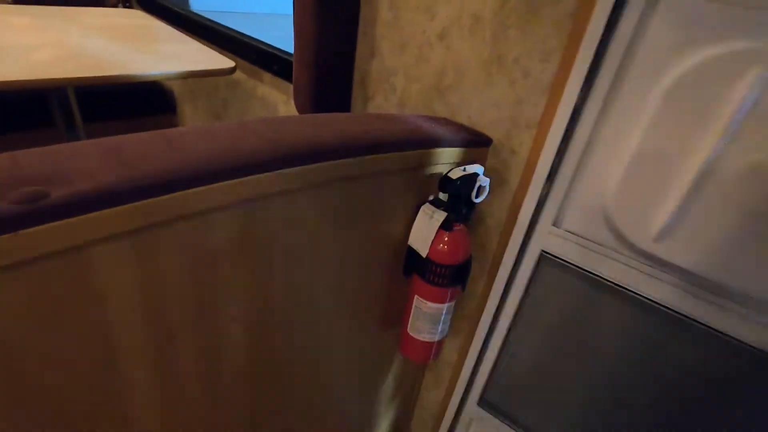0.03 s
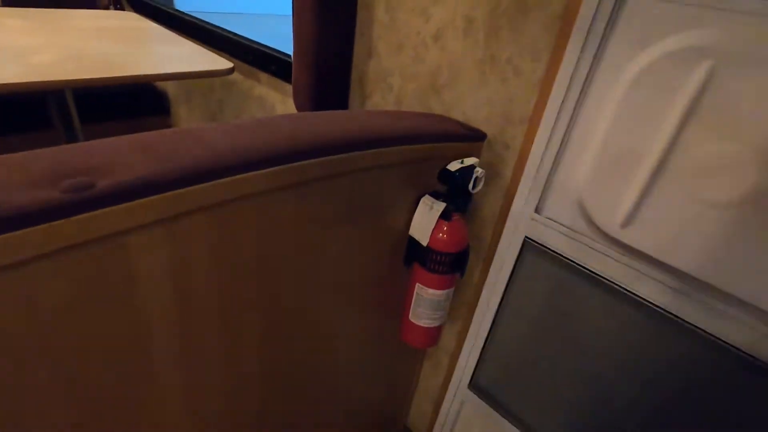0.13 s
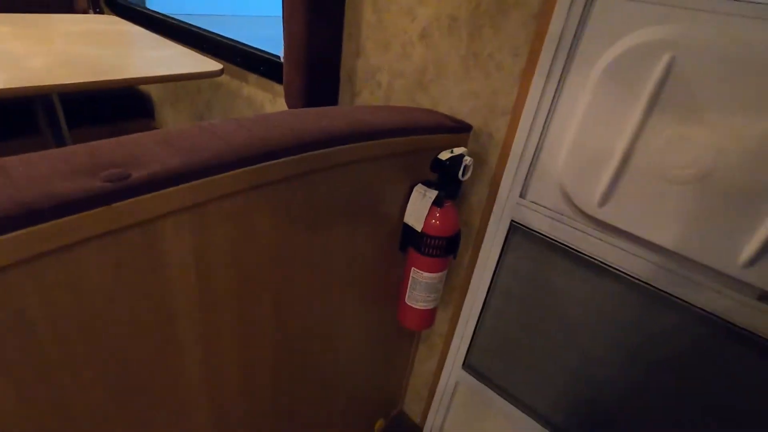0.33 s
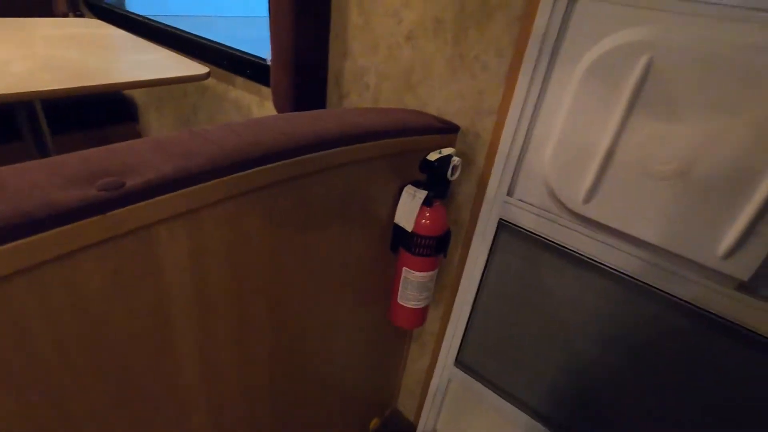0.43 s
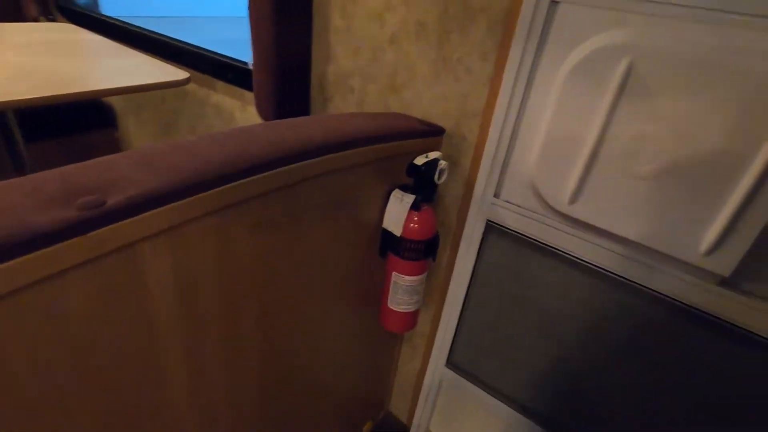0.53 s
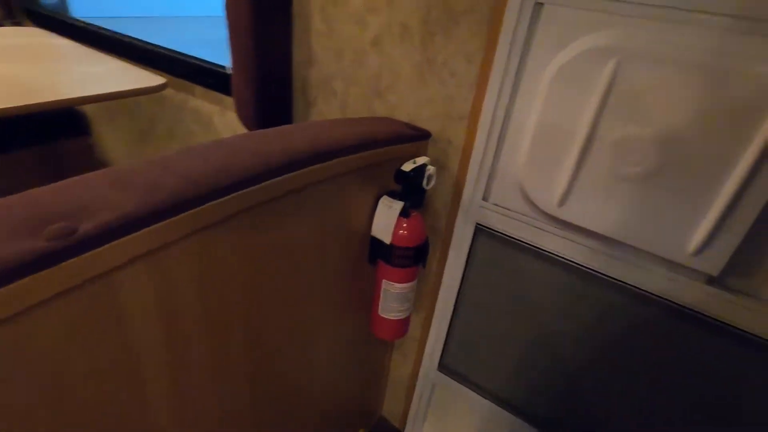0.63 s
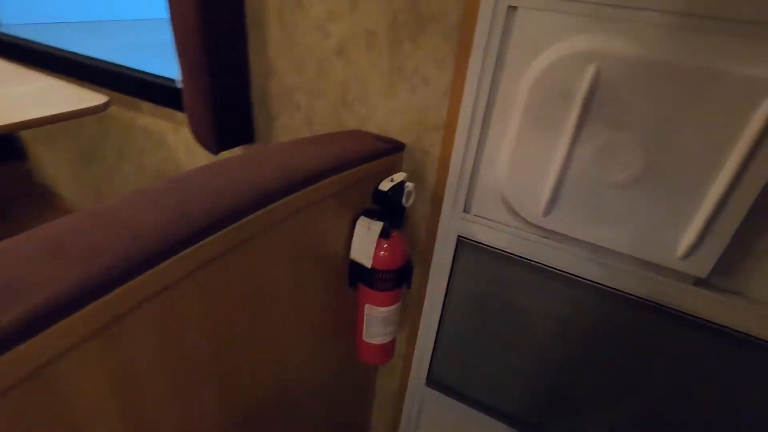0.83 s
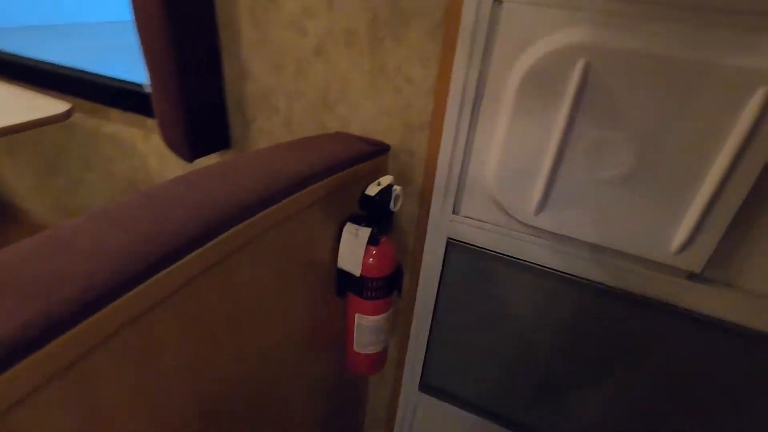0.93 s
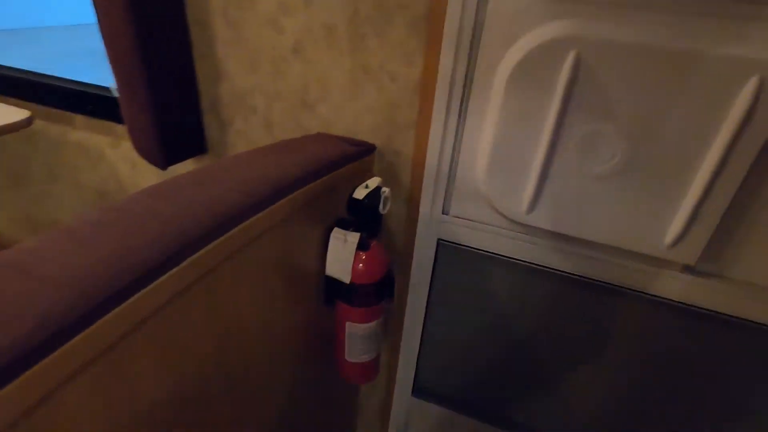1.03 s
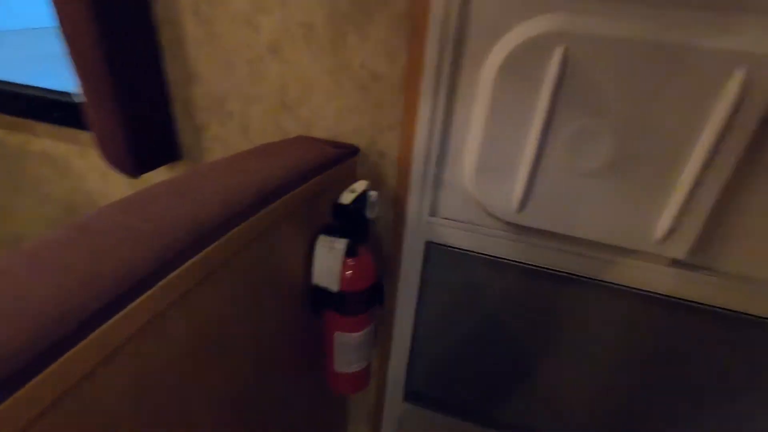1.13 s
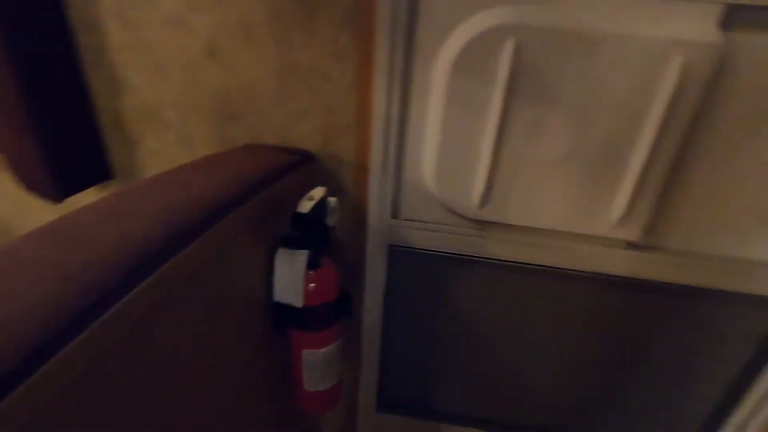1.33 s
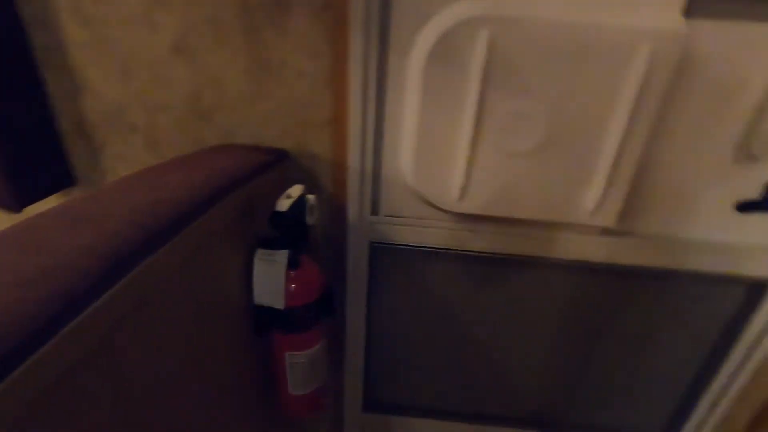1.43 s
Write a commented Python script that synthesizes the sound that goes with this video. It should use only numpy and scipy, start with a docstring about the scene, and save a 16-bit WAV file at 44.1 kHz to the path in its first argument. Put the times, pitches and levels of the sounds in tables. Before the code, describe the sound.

A light metal door slams inside a small trailer, close to the microphone. It swings in with a faint rush and small ticks, then hits at about 0.2 seconds with a sharp latch crack and a hollow boom. Walls and fittings rattle, fading by 0.7 seconds. Soft floor thuds come around 0.8 seconds and from 1.2 to 1.4, with faint clothing swishes and very faint latch clicks.

```python
"""A light aluminium door slams inside a small trailer, close to the microphone.
It swings in with a rush of air, the latch cracks on its plate, the panel booms, and the walls and
fittings rattle on. Afterwards something swishes faintly, like clothing, and a few soft knocks thud
on the hollow floor. The door sits dead centre; only the highest treble spreads to the sides."""
import sys
import numpy as np
from scipy import signal
from scipy.fft import rfft, irfft, next_fast_len
from scipy.io import wavfile

SR = 44100
rng = np.random.default_rng(int(sys.argv[2]) if len(sys.argv) > 2 else 0)


def dump(signal):
    """Clip the signal to [-1, 1] and save it as 16-bit WAV at the path in sys.argv[1]."""
    limited = np.clip(np.atleast_2d(signal).T, -1, 1)
    pcm = np.round(limited * 32767).astype(np.int16)
    wavfile.write(sys.argv[1], SR, pcm)


N = 66150
T = np.arange(N) / SR


def amp(db):
    """Decibels to gain."""
    return 10 ** (np.asarray(db) / 20)


def noise():
    """White noise of unit power."""
    return rng.standard_normal(N)


def colour(x, points):
    """Causal filter through (Hz, dB) points that keeps the power of white noise."""
    size = 2 * next_fast_len(N)
    octave = np.log2(np.maximum(np.arange(size // 2 + 1) * SR / size, 1))
    hz, db = np.array(points, float).T
    gain = amp(np.interp(octave, np.log2(hz), db))
    cepstrum = irfft(np.log(gain / np.sqrt(np.mean(gain ** 2))))
    cepstrum[1:size // 2] *= 2  # folded for minimum phase
    cepstrum[size // 2 + 1:] = 0
    return irfft(rfft(x, size) * np.exp(rfft(cepstrum)))[:N]


def decay(start, t60, attack=0.0001):
    """A quick rise, then a fall of 60 dB in t60; all times in seconds."""
    age = np.maximum(T - start, 0)
    return np.minimum(age / attack, 1) * np.exp(-np.log(1000) * age / t60)


def bursts(rows, points):
    """Decaying bursts of noise that share one colour."""
    envelope = sum(amp(db) * decay(start, t60) for start, db, t60 in rows)
    return colour(noise() * envelope, points)


def ring(start, modes, pitch=1, attack=0.00033):
    """Damped modes struck at one moment."""
    return sum(amp(db) * decay(start, t60, attack) * np.sin(2 * np.pi * hz * pitch * (T - start))
               for hz, db, t60 in modes)


# The air in the trailer. Each row: frequency in Hz, relative level in dB.
AIR_COLOUR = [(25, -16), (60, -8), (110, -3), (200, -3), (450, -8.5), (620, -11.5), (1100, -19.5),
              (2500, -21.5), (3500, -28), (5000, -26.5), (6000, -34.5), (7000, -34), (8000, -38),
              (10000, -39), (11500, -50.5), (14000, -59)]
# Steady tones. Each row: frequency in Hz, level in dB.
HUM_TONES = [(124, -74), (414.5, -59.5), (538, -64.5), (1244, -73.5)]

def room_tone():
    """Quiet air around the microphone, with a faint hum."""
    hum = sum(amp(db) * np.sin(2 * np.pi * hz * T) for hz, db in HUM_TONES)
    return amp(-54) * colour(noise(), AIR_COLOUR) + hum


# The rumble of the moving door. Each row: frequency in Hz, relative level in dB.
SWING_COLOUR = [(30, -22), (90, -8.5), (140, -11.5), (197, 6.5), (260, -15), (400, -0.5), (620, -7.5),
                (850, -14), (1250, -11.5), (2500, -53.5)]

def door_swing():
    """The door rumbles on its hinges and squeezes out a low puff of air just before it shuts."""
    end_s, fade_s = 0.19, 0.024
    puff_s, puff_width_s, puff_hz = 0.18, 0.025, 36
    rumble = amp(-42.5) * colour(noise(), SWING_COLOUR) * np.clip((end_s - T) / fade_s, 0, 1)
    puff_swell = amp(-35) * np.exp(-((T - puff_s) / puff_width_s) ** 2)
    return rumble + puff_swell * np.sin(2 * np.pi * puff_hz * (T - puff_s))


# Rubbing strokes. Each row: start in seconds, length in seconds, body level in dB, hiss level in dB.
SWISHES = [(-.05, 0.53, -46.5, -55.5), (.01, 0.08, -65, -59), (0.582, 0.21, -65, -56.5),
           (0.67, 0.079, -57.5, -87), (0.903, .15, -69.5, -67.5), (1.192, 0.22, -60, -73),
           (1.417, .1, -59, -71.5)]
# Their body and their hiss. Each row: frequency in Hz, relative level in dB.
SWISH_COLOUR = [(200, -5.5), (500, 6.5), (900, 0.5), (1300, 0.5), (2500, -3.5), (5000, -23.5), (8000, -46),
                (14000, -37)]
HISS_COLOUR = [(1000, -23), (2500, -0.5), (3400, 2.5), (5000, 1.5), (7000, -11), (8500, -19.5),
               (12000, -30), (15000, -46)]

def swishes():
    """The swinging door and clothes rub in faint swells of noise."""
    body, hiss = colour(noise(), SWISH_COLOUR), colour(noise(), HISS_COLOUR)
    out, fade_s = 0, 0.024
    for start, length, body_db, hiss_db in SWISHES:
        swell = np.clip(np.minimum(T - start, start + length - T) / fade_s, 0, 1)
        out = out + swell * (amp(body_db) * body + amp(hiss_db) * hiss)
    return out


# Knocks on floor and walls. Each row: start in seconds, level in dB, pitch factor, scuff level in dB.
THUDS = [(.002, -36.5, 0.92, -40.5), (.16, -25, 1.11, -30), (.174, -35, .7, -34), (0.195, -25, 0.64, -25.5),
         (.554, -39.5, 1.48, -56), (.697, -43, 3.3, -52), (0.782, -27, 0.97, -41.5),
         (0.824, -46, 1.014, -84), (.928, -49, 1.33, -55.5), (1.082, -50.5, 0.77, -55),
         (1.213, -34.5, 0.9, -45), (1.233, -31.5, 0.91, -41), (1.2646, -27.5, 0.96, -45),
         (1.339, -37, 1.06, -48.5), (1.376, -41, 0.61, -56), (1.418, -29, .6, -53)]
# The hollow floor. Each row: frequency in Hz at pitch factor 1, relative level in dB, t60 in seconds.
FLOOR_MODES = [(109.7, -13.5, 0.087), (198.8, 4, 0.071), (328.7, -8.5, 0.13)]
# The scuff of a knock. Each row: frequency in Hz, relative level in dB.
SCUFF_COLOUR = [(30, -13.5), (90, 2), (250, -1), (550, -3), (750, -9), (1000, -22.5), (2500, -26.5),
                (6000, -39.5), (12000, -62.5)]

def floor_thuds():
    """Soft knocks on the hollow trailer, each with a dull scuff; the deepest bass does not radiate."""
    knocks = sum(amp(db) * ring(start, FLOOR_MODES, pitch, attack=0.0033)
                 for start, db, pitch, _ in THUDS)
    low_cut = signal.butter(2, 65, "high", fs=SR, output="sos")
    scuffs = bursts([(start, scuff_db, 0.2) for start, _, _, scuff_db in THUDS], SCUFF_COLOUR)
    return signal.sosfilt(low_cut, knocks) + scuffs


# Small metal contacts. Each row: start in seconds, level in dB, t60 in seconds.
TICKS = [(.0295, -41.5, 0.021), (.103, -38, 0.013), (.109, -46, 0.016), (.1755, -45.5, 0.0057),
         (.1853, -37, 0.0039), (.2015, -41, .006), (1.236, -65, 0.027), (1.349, -60.5, 0.036),
         (1.451, -60, 0.043)]
# Their bright tone. Each row: frequency in Hz, relative level in dB.
TICK_COLOUR = [(500, -6), (3000, 12.5), (5200, 10), (7000, 2.5), (9000, -4), (12500, -28.5), (15000, -42)]

def hinge_ticks():
    """Hinge and latch tick during the swing, and very faintly a second after the slam."""
    return bursts(TICKS, TICK_COLOUR)


# The latch striking its plate. Each row: start in seconds, level in dB, t60 in seconds.
CRACKS = [(.2084, -7.5, 0.027), (.2135, -19, .025), (.2228, -22, 0.068), (.2295, -23, .04)]
# The crack from close up. Each row: frequency in Hz, relative level in dB.
CRACK_COLOUR = [(200, -23), (600, 5), (1050, -12.5), (1500, 1), (1950, -6), (2550, -3), (3400, -11),
                (5300, -9), (7300, -17.5), (8500, -28), (12200, -26), (15000, -51)]
# Door frame and latch spring. Each row: frequency in Hz, level in dB, t60 in seconds.
FRAME_MODES = [(1317, -33, .25), (1350, -28, 0.27), (1437, -3.5, 0.022), (1890, -16.5, 0.041),
               (2290, -21.5, .08), (2550, -27, .3), (2472, -27, 0.23)]
SPRING_MODES = [(10900, -36, 0.16), (10850, -42, .035)]

def latch():
    """Metal cracks on metal close to the microphone; the frame rings, then the latch spring."""
    return bursts(CRACKS, CRACK_COLOUR) + ring(0.2098, FRAME_MODES) + ring(0.229, SPRING_MODES)


# The walls' boom and the trailer's lingering hum. Each row: frequency in Hz, relative level in dB.
BOOM_COLOUR = [(25, -23.5), (55, -20.5), (80, -1), (122, 5.5), (160, -8.5), (215, 4.5), (300, -8),
               (450, -4), (650, -7.5), (900, -19), (1500, -32), (4000, -69.5)]
CABIN_COLOUR = [(30, -7), (80, -1), (140, -8), (195, 6), (300, -7), (600, -1), (1000, -14), (3000, -28.5),
                (8000, -53)]

def wall_boom():
    """The thin walls boom with the slam, and the body of the trailer hums on."""
    slam_s = 0.211
    boom = amp(-11.5) * colour(noise(), BOOM_COLOUR) * decay(slam_s, t60=0.5, attack=0.0083)
    cabin = amp(-34) * colour(noise() * decay(slam_s, t60=1.51), CABIN_COLOUR)
    return boom + cabin


# Door against frame. Each row: start in seconds, level in dB, frequency driven hardest in Hz.
BLOWS = [(.213, 4.5, 307), (0.2212, -1.5, 114), (.2236, -4.5, 687), (0.2685, -13, 107), (0.2774, -19, 594),
         (.3628, -12, 177), (0.4153, -17.5, 139), (.474, -20, 1000)]
# Door panel and wall. Each row: frequency in Hz, relative level in dB, t60 in seconds.
PANEL_MODES = [(38.9, -22, .5), (89.5, -9, 0.21), (127.3, -21.5, 0.45), (185.2, -7.5, 0.25),
               (237.4, -16.5, 0.5), (277.1, -26, 0.27), (335.5, -14.5, 0.32), (413.8, -9, 0.16),
               (484.2, -22.5, .33), (551.4, -29.5, 0.8), (646.5, -19, .22), (768.5, -18.5, .21),
               (881, -24, 0.36), (965, -21.5, 0.19)]

def door_panel():
    """The door hits, seats and shudders; each blow rings the panel modes near its own frequency."""
    out, width_octaves = 0, 1.2
    for start, db, centre_hz in BLOWS:
        modes = [(hz, mode_db - 6 * (np.log2(hz / centre_hz) / width_octaves) ** 2, t60)
                 for hz, mode_db, t60 in PANEL_MODES]
        out = out + amp(db) * ring(start, modes, attack=0.003)
    return out


# Single knocks of the fittings. Each row: start in seconds, level in dB, t60 in seconds.
CLATTERS = [(.283, -21.5, 0.039), (.338, -34.5, 0.076), (.364, -21.5, 0.12), (.445, -39, 0.15)]
# The tone of the fittings. Each row: frequency in Hz, relative level in dB.
RATTLE_COLOUR = [(100, -9.5), (200, 2.5), (330, 3.5), (600, 5.5), (720, -0.5), (850, 4), (1080, -2),
                 (1500, 0), (2100, -1), (2500, -4), (3300, -4), (5000, -4.5), (6500, -13.5), (8200, -18),
                 (11000, -25.5), (13000, -32), (15000, -57)]

def fittings():
    """A dense rattle fades slowly, then dies away quickly; a few knocks stand out."""
    start_s, attack_s, hold_s = 0.219, 0.01, 0.25
    sag_db_per_s, release_db_per_s, clicks_per_s = 59, 182, 2500
    age = np.maximum(T - start_s, 0)
    fall_db = sag_db_per_s * np.minimum(age, hold_s) + release_db_per_s * np.maximum(age - hold_s, 0)
    envelope = amp(-19.5 - fall_db) * np.minimum(age / attack_s, 1)
    contacts = rng.random(N) < clicks_per_s / SR
    clicks = contacts * rng.choice([-1, 1], N) * amp(1.5 * noise())
    smeared = (clicks / clicks.std() + noise()) / np.sqrt(2)
    return colour(smeared * envelope, RATTLE_COLOUR) + bursts(CLATTERS, RATTLE_COLOUR)


def reflections(x):
    """The near walls return a dense cluster of echoes at about the power of the source."""
    echoes = noise() * decay(0, t60=0.14)
    return signal.fftconvolve(x, echoes / np.linalg.norm(echoes))[:N]


# The stereo width, strongest in the highest treble. Each row: frequency in Hz, relative level in dB.
SIDE_COLOUR = [(30, -29), (120, -52), (500, -34), (1000, -29), (2000, -22), (4000, -19.5), (8000, -9),
               (10500, -13), (12500, 9.5), (16000, 1.5)]

def scene():
    """The door is close and central; rattle, swing and swishes also arrive off the walls."""
    echo_share = 0.17  # of the power
    around = fittings() + door_swing() + swishes()
    close = latch() + hinge_ticks() + door_panel() + wall_boom() + floor_thuds()
    mid = close + room_tone() + np.sqrt(1 - echo_share) * around
    mid += np.sqrt(echo_share) * reflections(around)
    side = amp(-9.5) * colour(reflections(mid), SIDE_COLOUR)
    return np.array([mid + side, mid - side])


def record(dry):
    """The microphone rounds the loudest peaks and cuts the top above 14.3 kHz."""
    rounded = dry / (1 + dry ** 4) ** (1 / 4)
    top_cut = signal.ellip(8, 0.2, 80, 14300, fs=SR, output="sos")
    return signal.sosfilt(top_cut, rounded)


dry = scene()
out = record(dry)
dump(out)
```